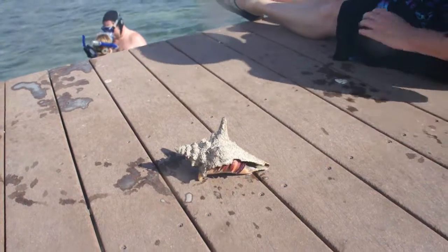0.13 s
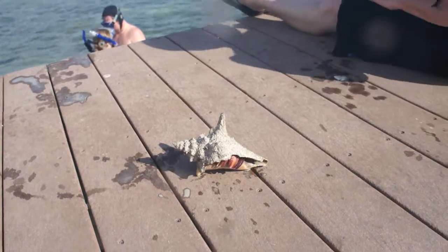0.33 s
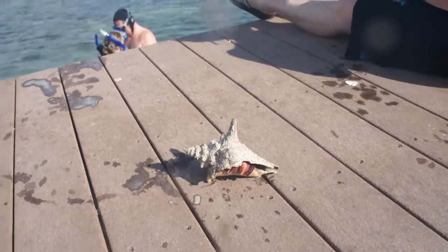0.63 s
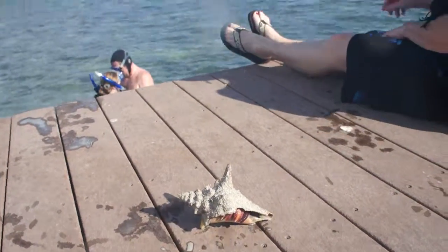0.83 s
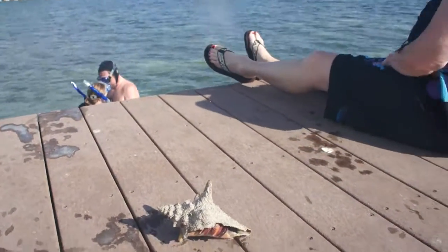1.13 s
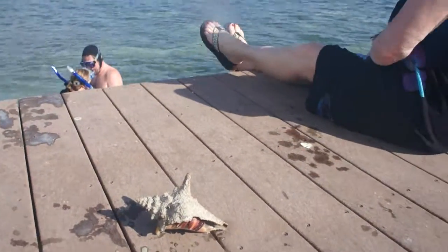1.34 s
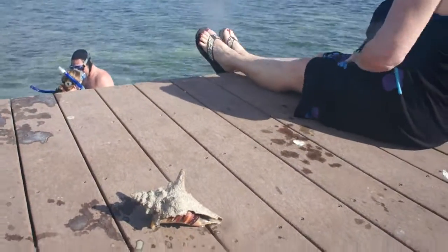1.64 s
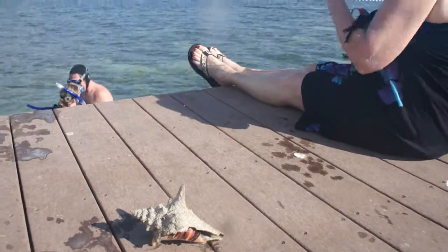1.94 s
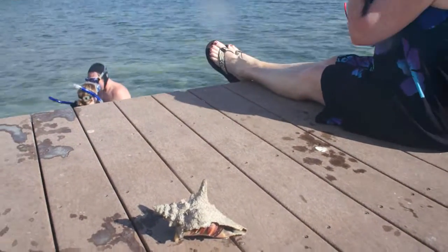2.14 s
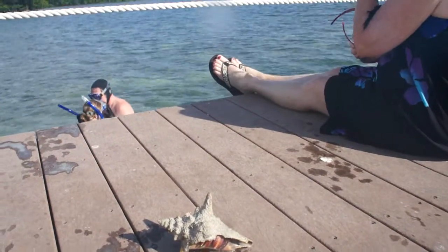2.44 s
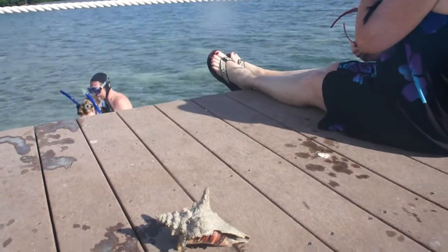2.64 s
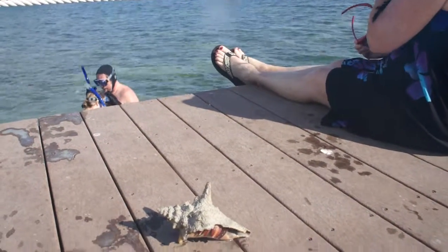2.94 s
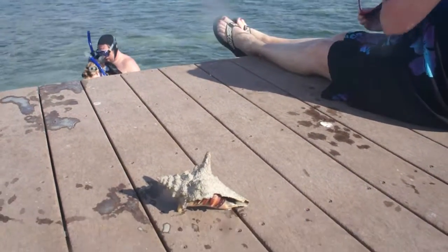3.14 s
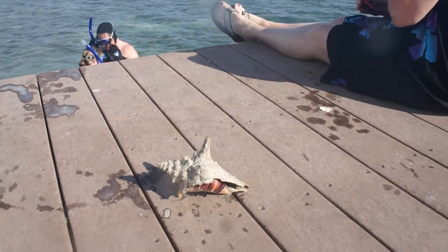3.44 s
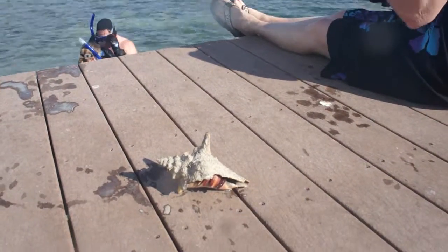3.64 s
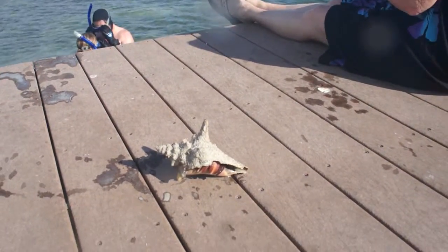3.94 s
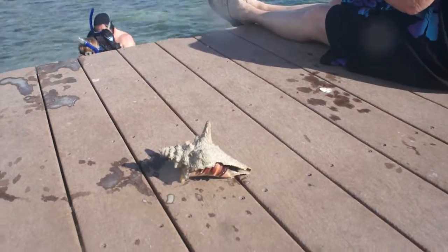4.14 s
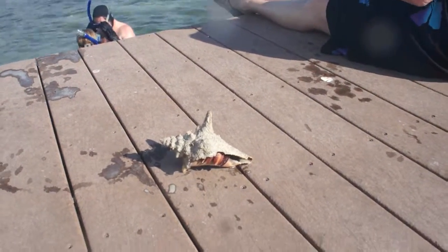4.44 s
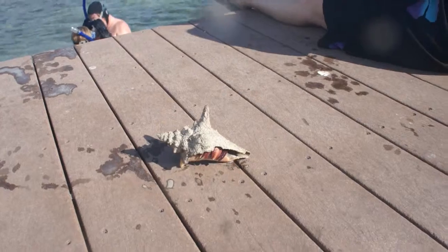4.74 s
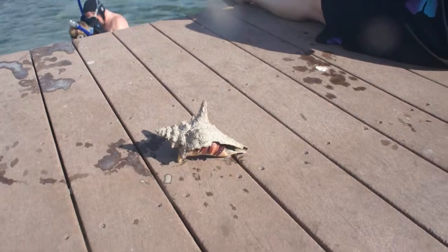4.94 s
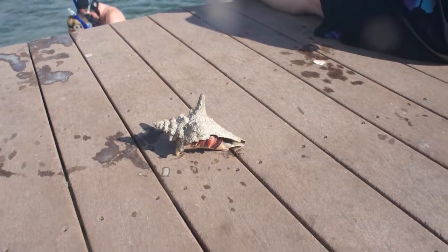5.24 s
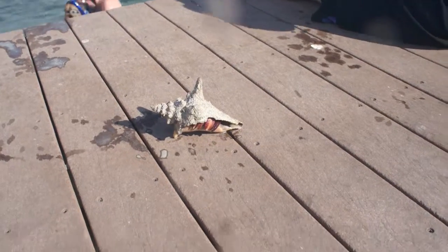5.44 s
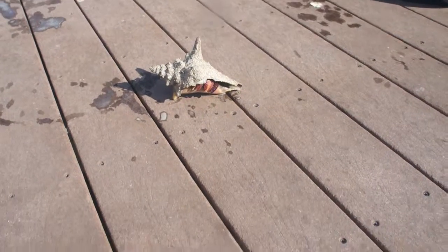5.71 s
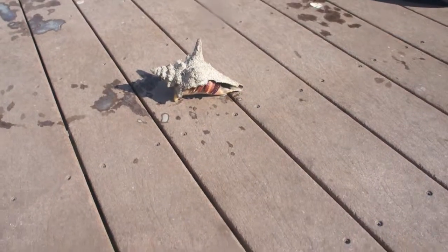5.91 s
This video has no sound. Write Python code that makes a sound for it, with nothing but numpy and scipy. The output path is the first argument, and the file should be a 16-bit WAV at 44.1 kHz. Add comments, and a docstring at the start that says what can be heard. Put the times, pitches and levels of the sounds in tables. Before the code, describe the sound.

Stick-slip creaks and small clicks from a hollow plastic-like body, extremely close and dry, over a soft airy wash and low rumble.

```python
"""A hard, hollow body very near the microphone creaks in short stick-slip bursts: pushes ring its modes.
It is a shell, or more likely the hand-held case around the microphones, as a hermit crab edges over wood.
Knocks ring the same modes with one blow and a noisy tick; dry scrapes feed them dense grains of grit.
Faint noise creeps on between the rubs. Shaped noise makes a wash of open air, a rumble that rises and falls,
soft humming bands of the hollow body and a faint high hiss on the left."""
import sys
import numpy as np
from scipy import signal
from scipy.fft import rfft, irfft, next_fast_len
from scipy.io import wavfile

SR = 44100
rng = np.random.default_rng(int(sys.argv[2]) if len(sys.argv) > 2 else 0)


def unload_wav(signal):
    """Save mono or channel-first audio to the path in sys.argv[1] as 16-bit WAV at rate SR, clipped to [-1, 1]."""
    wavfile.write(
        sys.argv[1],
        SR,
        np.round(np.clip(np.atleast_2d(signal).T, -1, 1) * 32767).astype(np.int16),
    )


N = 267687
TIME = np.arange(N) / SR

# stick-slip rubs: main_slip_s, runup_s (before the slip), length_s, level_db (middle modes),
# tilt_db (added to the high modes, taken from the low ones)
RUBS = [(0.041, 0, .005, -42, 2.5), (0.246, 0, .022, -47, 0), (0.367, 0, 0.0057, -37, 1),
        (0.425, 0.0044, .017, -20, 4), (0.444, 0, 0.02, -13, 4), (0.465, 0.017, 0.044, -14.5, 1),
        (0.934, 0.0038, 0.024, -35, 0), (1.115, 0.02, 0.016, -26, -3.5), (1.146, 0.00053, 0.021, -37, -3.5),
        (1.299, 0.016, .02, -36, -1.5), (1.457, .028, 0.014, -21, -2.5), (1.47, 0.00092, 0.042, -17, -2),
        (1.565, 0.0014, 0.026, -23, 5.5), (1.59, 0, .026, -13.5, 0.5), (1.633, 0, 0.0072, -37, 6.5),
        (1.674, 0.0002, 0.023, -34.5, 0), (1.733, 0, 0.0092, -23, -0.5), (1.82, 0.002, 0.021, -41, 5.5),
        (1.954, .012, .025, -15.5, -1), (2.027, 0, .012, -35, -1), (2.08, 0, .008, -41, -3.5),
        (2.104, 0, .007, -41, -4), (2.127, 0, 0.0096, -32, 2), (2.153, 0.0043, .036, -35.5, 1.5),
        (2.258, 0.027, 0.0083, -29.5, 2.5), (2.283, 0, .024, -44.5, 4), (2.325, 0.0037, 0.026, -39.5, 2.5),
        (2.355, 0.0019, 0.0076, -41, 10.5), (2.426, 0.0049, 0.0044, -42, 11.5),
        (2.541, 0.025, 0.018, -27, -3.5), (2.965, 0.0037, 0.033, -37.5, 4),
        (2.995, 0.0037, .03, -35.5, -0.5), (3.186, 0.011, 0.031, -36, -2), (3.272, 0, .012, -31, -3),
        (3.785, 0.0015, 0.0065, -41, -0.5), (4.104, 0, 0.0057, -34.5, -0.5), (4.303, 0, .005, -29.5, -2.5),
        (4.519, 0, 0.023, -39.5, -4), (4.555, 0, 0.029, -45, -3), (4.591, 0.0043, 0.028, -41.5, -6.5),
        (4.642, 0, 0.023, -43, -2), (4.744, 0, 0.022, -42.5, -2.5), (4.934, 0, 0.0056, -26.5, 7),
        (5.025, 0.0032, .02, -20.5, -2), (5.048, 0, .02, -21, 1.5), (5.072, 0.0048, 0.026, -29.5, -5),
        (5.158, 0.003, .01, -32, -2), (5.228, 0.0039, 0.014, -38, -1.5), (5.497, 0.025, 0.019, -22, -2),
        (5.535, 0.0077, 0.025, -27, -1), (5.717, 0.0075, 0.009, -33, -1.5), (5.817, 0, .012, -45, -8),
        (5.887, 0.028, .025, -30.5, -3), (6.013, 0, .008, -30.5, 0.5)]
# place of contact on the body: time_s, outer_modes_db (low and high modes against the middle ones)
CONTACT = [(0, 0.5), (1.6, -1), (3.2, 3.5), (4.9, -2), (6.07, -3)]
# knocks and clicks: start_s, level_db (upper modes), hardness_db (of the contact)
KNOCKS = [(0.4477, -31, -1.5), (0.637, -37.5, -4.5), (0.643, -40.5, 1), (0.88, -24.5, -8.5),
          (0.915, -33.5, -14), (0.979, -45, -10.5), (2.844, -38.5, -7), (3.009, -32, -3.5),
          (3.065, -26.5, 4.5), (3.181, -34.5, -7), (3.879, -44.5, 8.5), (4.046, -39.5, 11),
          (4.055, -41.5, 17), (4.129, -41, 9), (4.286, -38.5, 2), (4.309, -42.5, 12)]
# dry scrapes: start_s, length_s, rumble_db (thud modes), hiss_db (reference for the treble)
SCRAPES = [(0.409, 0.18, -49.5, -53), (0.584, 0.09, -53, -53), (0.886, 0.035, -38, -47.5),
           (0.921, 0.07, -49, -67), (2.853, 0.15, -57, -59.5), (2.985, 0.1, -38.5, -54),
           (3.051, 0.065, -38, -41), (3.105, 0.17, -47.5, -50.5), (4.055, 0.077, -59, -57.5),
           (4.133, 0.031, -47, -75), (4.251, 0.047, -47.5, -47.5)]
# modes of the hollow body: pitch_hz, width_hz, level_db (relative), left_minus_right_db, left_lead_rad
BODY_MODES = [(165, 45, -12, -15, 1.5), (198, 61, -2, -4.5, -3), (287, 33, 4, 6, 0.5),
              (395, 100, -6, -40, 1), (625, 46.5, 0, -0.5, 0.48), (942, 28, -5.5, 27, 1.5),
              (1043.6, 88, 3, 8, 0.52), (1120, 88, -12.5, 19, -0.1), (1165.3, 28, -9.5, 0.5, 4),
              (1309, 225, 0.5, -1, -2.5), (1350, 62, -20.5, 12.5, -7), (1492.5, 80, 2, -54, 4.5),
              (1552, 172, -1.5, -3, -1.5), (1760, 120, -6, 7.5, -2.0), (1896, 80, 8, 7, -3),
              (2130, 28, -36, -23, 0), (2589, 30, 0.5, -37, 0.5), (2980, 910, -7, -29, -3.5),
              (3530, 140, 1, -1.5, 5.5), (3750, 550, -18.5, -2.5, -1.5), (4600, 2200, 1, 46.5, 1.4),
              (6100, 480, 6, -5, 4), (6970, 600, 5.5, 5.5, 1.5), (8270, 2200, -7.5, 5, 6.5),
              (9000, 2500, -5, 23, 5.5)]
# slow levels between the events: time_s, rumble_db, creep_db (reference for the creeping contact)
UNREST = [(0.0, -63.5, -57.5), (0.64, -52.5, -52), (1.59, -51.5, -48), (2.25, -52.5, -47.5),
          (2.76, -54.5, -56), (3.08, -47, -34.5), (3.29, -74, -58), (3.77, -64.5, -68), (4.402, -60.5, -75),
          (4.6, -54.5, -43.5), (4.899, -53, -58), (5.09, -51, -51.5), (6.07, -53.5, -55)]
# spectrum of the open air: pitch_hz, density_db (per Hz, relative)
AIR_SPECTRUM = [(25, -36), (60, -20), (100, -10), (160, -7.5), (250, 6.5), (480, 1), (800, -0.5),
                (1500, -3.5), (2200, -8.5), (3200, -9), (5000, -12.5), (8000, -15.5), (11000, -19)]
# soft resonant bands of the hollow body, and last a faint high hiss on the left:
# pitch_hz, half_width_hz (to half amplitude), level_db (rms), left_minus_right_db
SOFT_BANDS = [(419.7, 14, -58, -10), (628.3, 20, -57, -1), (1083, 40, -60, 21), (1280, 90, -66.5, -11),
              (10210, 370, -70, 17)]

# groups of the body's modes: (from Hz, to Hz)
THUD, LOW, MIDDLE, HIGH, UPPER = (150, 520), (555, 710), (900, 1180), (1220, 1800), (850, 2100)
RASP, GRIT, TICK, HISS = (1800, 3400), (2000, 4900), (4000, 10600), (5600, 7800)


def rubs(lead_s=0.002, jolt=0.96, jolt_s=0.023, swell_db=9, runup_db=-9.5, trail_db=-21, trail_s=0.024):
    """Stick-slip: the contact may creak softly first, then gives way and drags on faintly."""
    out = np.zeros((2, N))
    for slip_s, runup, length, level_db, tilt_db in RUBS:
        start = slip_s - lead_s  # the modes take a moment to build up
        outer_db = np.interp(start, *np.transpose(CONTACT))
        if runup > 0:
            force = stroke(runup)
            force = force * undb(np.linspace(-swell_db, 0, len(force)))
            add(out, start - runup, rub(force, level_db + runup_db, tilt_db, 0, outer_db))
        slip_jolt = jolt * min(1, jolt_s / length)  # long rubs start more gently
        add(out, start, rub(stroke(length), level_db, tilt_db, slip_jolt, outer_db))
        add(out, start + length, rub(stroke(trail_s), level_db + trail_db, tilt_db, 0, outer_db))
    return out


def rub(force, level_db, tilt_db, jolt, outer_db, firm_db=-17, light_spread=0.068, bite=0.94):
    """Part squeak, part rough slipping, light rubs spread wider; all carry some grit, louder in firm ones."""
    t, length = TIME[:len(force)], len(force) / SR
    push = slips(force, rate=830, scatter_db=0.0)
    push[0] += jolt  # the grip breaks
    rough = unit(push)
    # the low and high modes gain light_spread dB for each dB that a rub is lighter than firm
    outer_db = level_db + outer_db + light_spread * (firm_db - level_db)
    high_db = outer_db - 3.5 + tilt_db
    # group, level dB, squeak's share of the push, fade of the push as pressure eases (dB per s)
    voices = (
        (LOW, outer_db - 6 - tilt_db, 0.8, 30),
        (MIDDLE, level_db, 0.8, 147),
        (HIGH, high_db, 0.5, 172))
    sound = 0
    for group, db, share, ease in voices:
        tone = unit(squeak(force, group))
        # a tone feeds its mode far better than clicks do, so the clicks are boosted by 9
        blend = np.sqrt(share) * tone + np.sqrt(1 - share) * 9 * rough
        sound = sound + ring(blend * undb(-ease * t), group, db, length)
    grit = slips(force * undb(-180 * t), rate=2200, scatter_db=2.5)
    grit_db = firm_db + bite * (high_db - firm_db)  # follows the ring of the high modes
    sound = sound + ring(grit, RASP, grit_db - 22, length)
    return sound + ring(grit, TICK, grit_db - 33, length)


def squeak(force, group, detune=0.013, wander_hz=8):
    """Friction locks onto one mode of a group, most often a strong one; its pitch wanders with the grip."""
    centres, _, dbs = np.transpose(modes_of(group))[:3]
    odds = undb(2 * dbs)
    hz = rng.choice(centres, p=odds / odds.sum()) * (1 + detune * rng.standard_normal())
    drift = np.cumsum(rng.standard_normal(len(force))) * np.sqrt(2 * np.pi * wander_hz / SR)
    return force * np.sin(2 * np.pi * hz * TIME[:len(force)] + drift)


def stroke(length, skew=0.46, fullness=0.086, stutter_db=4.0, stutter_rate=230):
    """Contact force over one stroke: it swells, stutters as the surfaces catch, and lets go."""
    where = np.linspace(0, 1, max(int(length * SR), SR // 400))
    catches = np.clip(rng.standard_normal(int(length * stutter_rate) + 2), -1.5, 1.5)
    stutter = np.interp(where, np.linspace(0, 1, len(catches)), catches)
    swell = np.abs(np.sin(np.pi * where ** skew)) ** fullness
    return swell * undb(stutter_db * stutter)


def slips(force, rate, scatter_db):
    """Little slips of either sign, about rate per second at jittered moments, sized by the contact force."""
    count = int(len(force) / SR * rate) + 3
    when = ((np.arange(count) + rng.random(count)) / count * len(force)).astype(int)
    sizes = undb(scatter_db * rng.standard_normal(count))
    push = np.zeros(len(force))
    np.add.at(push, when, rng.choice([-1, 1], count) * sizes)
    return push * force


def knocks(crack_s=0.0038, chatter=0.1, length=0.013):
    """One blow and a brief chatter of the surfaces; harder contact means less thud, more tick."""
    out = np.zeros((2, N))
    t = TIME[:SR // 50]
    for start, level_db, hard_db in KNOCKS:
        thud_db = level_db - 2.5 - 0.12 * hard_db
        low_db = level_db - 0.5 - 0.52 * hard_db
        tick_db = level_db - 7.5 + hard_db
        grit_db = (level_db + tick_db) / 2 - 6
        blow = 1. * (t == 0)
        rattle = chatter * rng.standard_normal(len(t)) * np.exp(-t / crack_s)
        for group, db in ((THUD, thud_db), (LOW, low_db), (UPPER, level_db)):
            add(out, start, ring(blow + 0.36 * rattle, group, db, length))
        for group, db in ((GRIT, grit_db), (TICK, tick_db)):
            add(out, start, ring(blow + rattle, group, db, length))
    return out


def scrapes(fade_db=8):
    """Dense grains of a dry surface sliding, weakening as they go: hiss on top, a rumble in the body."""
    out = np.zeros((2, N))
    for start, length, rumble_db, hiss_db in SCRAPES:
        force = stroke(length, skew=0.99, fullness=0.6, stutter_db=3.0)
        fade = undb(np.linspace(0, -fade_db, len(force)))
        push = slips(force * fade, rate=4000, scatter_db=3.0)
        levels = (
            (THUD, rumble_db), (LOW, rumble_db - 6),
            (UPPER, hiss_db + 2), (RASP, hiss_db - 6),
            (TICK, hiss_db - 1), (HISS, hiss_db - 11))
        for group, db in levels:
            add(out, start, ring(push, group, db, length))
    return out


def fidgets(patchy_db=3.5, rate=45):
    """Between the rubs the contact keeps creeping: patchy noise softly rings the body."""
    times, _, creep_db = np.transpose(UNREST)
    steps = np.arange(0, TIME[-1] + 1, 1 / rate)
    patches = np.interp(TIME, steps, rng.standard_normal(len(steps)))
    push = rng.standard_normal(N) * undb(patchy_db * patches)
    creep = 0
    for group, db in ((LOW, -4), (MIDDLE, -2), (HIGH, -6)):
        body = response(group, vary_db=0, vary_rad=0)
        creep = creep + undb(db) * unit(signal.fftconvolve(push[None], body, axes=1)[:, :N])
    return creep * undb(np.interp(TIME, times, creep_db))


def modes_of(group):
    """The body's modes whose pitch lies in a group."""
    return [mode for mode in BODY_MODES if group[0] <= mode[0] < group[1]]


def response(group, vary_db=0.96, vary_rad=0.36, vary_hz=3000):
    """Decaying sines of a group; each contact reweights them and shifts phases, high ones the most."""
    t = TIME[:SR // 12]
    out = np.zeros((2, len(t)))
    for hz, width, db, pan_db, lead in modes_of(group):
        spread = .5 + hz / vary_hz
        phase = np.array([[lead], [-lead]]) / 2 + vary_rad * spread * rng.standard_normal((2, 1))
        gain = undb(db + vary_db * rng.standard_normal((2, 1))) * sides(pan_db)
        decay = width * np.exp(-np.pi * width * t)  # a wide mode dies fast
        out += gain * decay * np.sin(2 * np.pi * hz * t + phase)
    # a group radiates little outside its own range
    edges = [group[0] * 0.78, group[1] * 1.03]
    return signal.sosfilt(signal.butter(3, edges, "band", fs=SR, output="sos"), out)


def ring(push, group, db, length):
    """A push rings a group of modes, with the energy of a sound of this rms level and length."""
    sound = signal.fftconvolve(push[None], response(group), axes=1)
    return sound * undb(db) * np.sqrt(2 * length * SR / np.sum(sound ** 2))


def background():
    """Steady open air and soft bands, with a rumble that rises and falls."""
    return open_air() + rumble() + soft_bands()


def open_air(level_db=-51):
    """Smooth broadband hiss, drawn through the spectrum points on a log pitch axis."""
    points, dbs = np.transpose(AIR_SPECTRUM)
    return wide(lambda hz: undb(np.interp(np.log(hz), np.log(points), dbs))) * undb(level_db)


def rumble(centre_hz=238, pan_db=-4):
    """A low band of noise whose level rises and falls."""
    times, level_db, _ = np.transpose(UNREST)
    swell = undb(np.interp(TIME, times, level_db))
    band = wide(lambda hz: 1 / (1 + (np.log(hz / centre_hz) / 0.13) ** 2))
    return band * swell * sides(pan_db)


def soft_bands():
    """Steady noise in peaked bands: soft resonances of the hollow body, and a faint high hiss on the left."""
    out = 0
    for centre, width, db, pan_db in SOFT_BANDS:
        band = noise(lambda hz: 1 / (1 + ((hz - centre) / width) ** 2))
        out = out + band * undb(db) * sides(pan_db)
    return out


def wide(gain_at, shared=0.081):
    """Stereo noise of rms 1 with only a little in common between the sides."""
    common = noise(gain_at)
    return unit(np.array([shared * common + noise(gain_at) for _ in range(2)]))


def noise(gain_at):
    """Noise of rms 1 whose spectrum follows a function of frequency."""
    size = next_fast_len(N)
    hz = np.arange(size // 2 + 1) * SR / size + 1  # 1 Hz up, to keep logarithms finite
    return unit(irfft(rfft(rng.standard_normal(size)) * gain_at(hz), size)[:N])


def undb(db):
    """Decibels to gain."""
    return 10 ** (np.asarray(db) / 20)


def unit(x):
    """Scale to rms 1."""
    return x / np.sqrt(np.mean(x ** 2))


def sides(pan_db):
    """Left and right gains of constant total power, pan_db apart."""
    return unit(undb(np.array([[pan_db], [-pan_db]]) / 2))


def add(out, start, sound):
    """Mix a stereo sound in at a time in seconds."""
    i = int(start * SR)
    out[:, i:i + sound.shape[1]] += sound[:, :N - i]


def scene():
    """Everything is close and dry, in the open air."""
    return rubs() + knocks() + scrapes() + fidgets() + background()


def record(dry, bass_hz=62, top_hz=11050):
    """The recorder stops at full scale, thins the deep bass and cuts the top."""
    clipped = np.clip(dry, -1, 1)
    thin = signal.sosfilt(signal.butter(2, bass_hz, "high", fs=SR, output="sos"), clipped)
    return signal.sosfilt(signal.ellip(10, .2, 70, top_hz, fs=SR, output="sos"), thin)


dry = scene()
out = record(dry)
unload_wav(out)
```